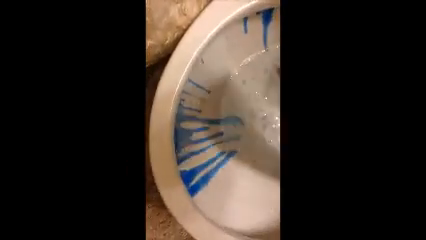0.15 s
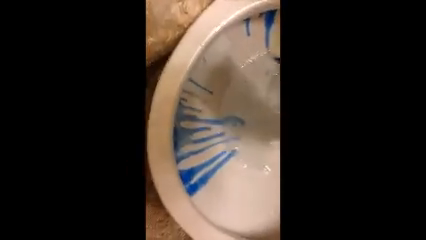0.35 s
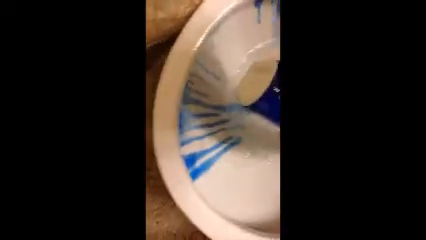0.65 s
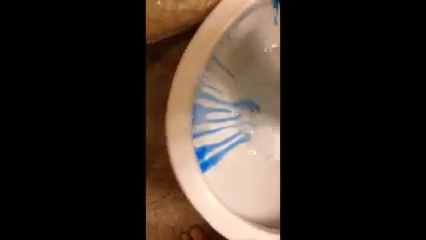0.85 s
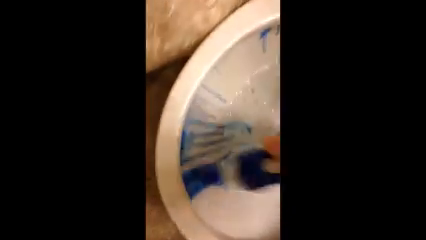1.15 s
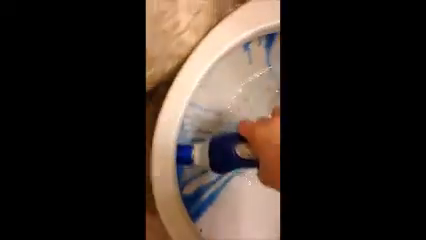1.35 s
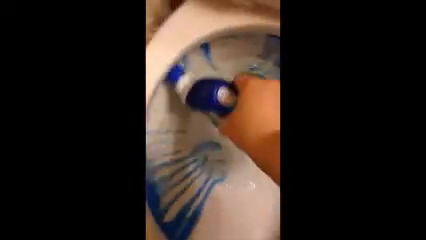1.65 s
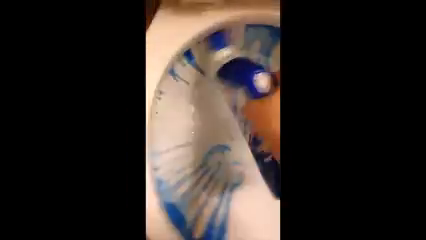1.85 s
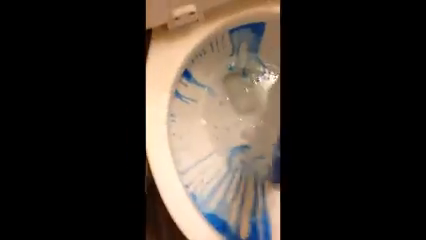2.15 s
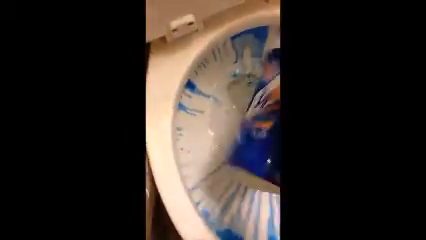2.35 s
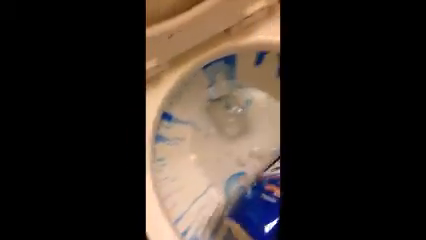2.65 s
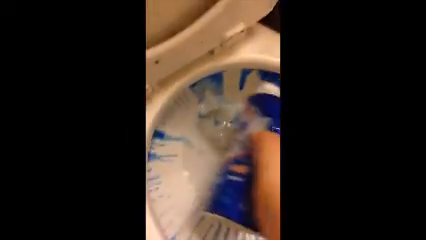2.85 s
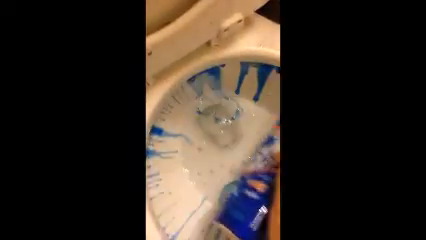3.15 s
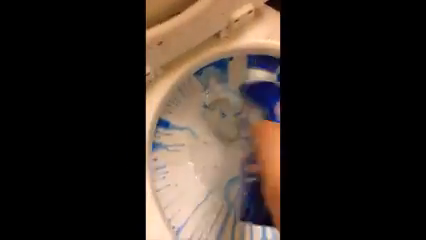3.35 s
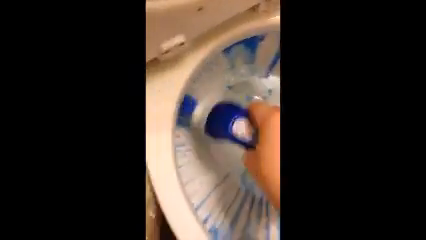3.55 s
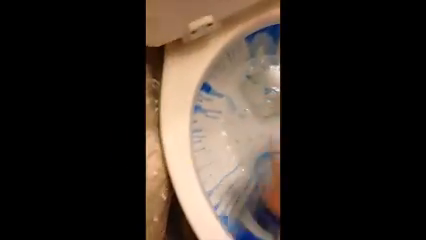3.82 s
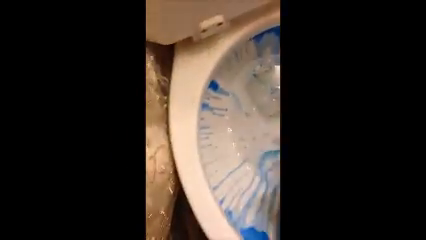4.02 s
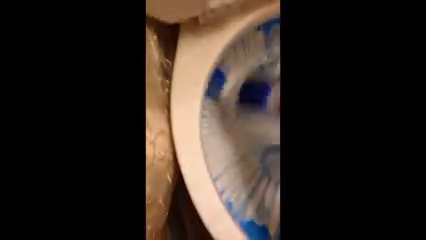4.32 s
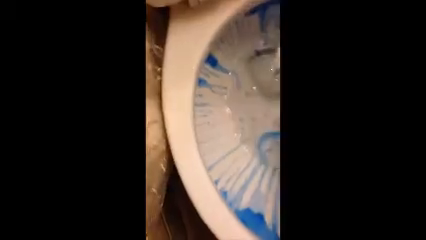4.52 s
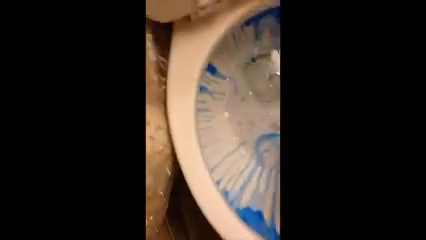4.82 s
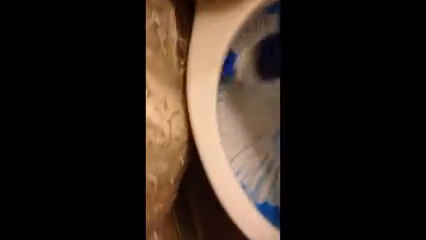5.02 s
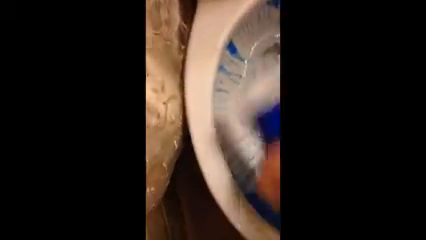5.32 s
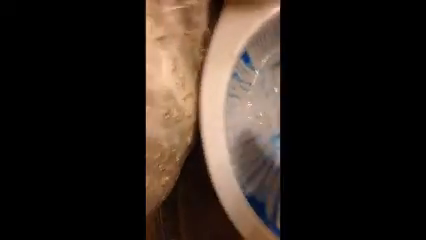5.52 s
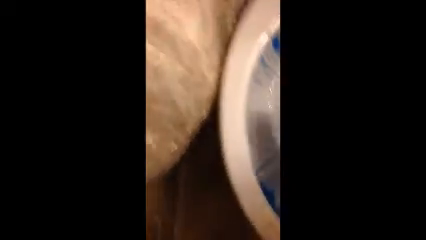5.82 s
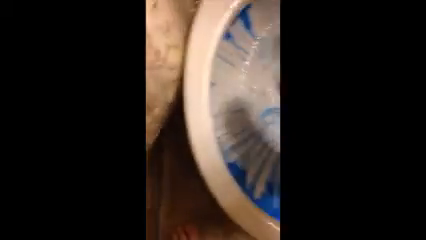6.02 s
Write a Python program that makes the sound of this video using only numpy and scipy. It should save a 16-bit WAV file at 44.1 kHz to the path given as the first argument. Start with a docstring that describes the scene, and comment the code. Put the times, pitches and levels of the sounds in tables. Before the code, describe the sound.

A plastic cleaner bottle rubs quickly under the rim of a porcelain toilet bowl, heard close through a small, bass-thin microphone. From 0 to 0.5 s, low hollow rubs and soft knocks are followed by bright ticks; lighter strokes and clicks continue to about 1.2 s. At 1.4 s a firm cluster of thuds and cracks lands, leading into stuttering scrapes through 2.5 s, with a sharp tick near 2.4. A short lull follows, then a knock at 2.9 and raspier strokes. From 3.3 to 4.5 s rubbing is nearly continuous, with hollow knocks crowded around 3.7. After a quieter gap, the strongest knock hits at 4.9 s, then harsh, fast scraping peaks around 5.3 with a ringing tick. Shorter rubs and taps run to the end at 6.1 s. Short, sparse tile echoes, faint hiss and a deep wavering drone remain throughout.

```python
"""A plastic bottle of cleaner is dragged in quick strokes under the rim of a porcelain toilet bowl.
Its nozzle stutters over the glaze: stick-slip clicks ring the hollow bottle and the stiff modes, with a hiss.
Knocks on the rim ring the same modes with a crack of noise; small bright ticks snap in between.
Sparse echoes come back from bowl and tiles, over a deep wavering drone and a faint room hiss.
A small microphone takes it all in, thin in the bass."""
import sys
import numpy as np
from scipy import signal
from scipy.fft import rfft, irfft
from scipy.io import wavfile
from scipy.ndimage import uniform_filter1d

SR = 44100
rng = np.random.default_rng(int(sys.argv[2]) if len(sys.argv) > 2 else 0)


def makeup_ratio(level_db):
    """Linear amplitude ratio for a level in decibels (20 dB per factor of ten)."""
    decades = np.asarray(level_db, float) / 20
    return 10 ** decades


def to_wav(sig):
    """Store sig (one row per channel, or 1-D mono) as 16-bit WAV at the path in sys.argv[1].

    Samples outside -1..1 are clipped; the rate is SR.
    """
    pcm = np.clip(np.atleast_2d(sig), -1, 1) * 32767
    pcm = np.round(pcm).astype(np.int16)
    wavfile.write(sys.argv[1], SR, pcm.T)  # frames by channels


N = 272538  # length of the scene in samples
CONTROL_STEP = 64  # samples between values of the slow controls

# The nozzle meets the rim. Each row: time in seconds, then relative levels in dB of the blow
# to the stiff modes, the hollow thud and the crack.
KNOCKS = [(0.092, -18, -9.5, -56), (0.306, -30, -10, -60), (0.822, -23, -13.5, -56), (1, -38, -17.5, -70),
          (1.383, -17, 3.5, -15), (1.427, -4.5, 1.5, -15.5), (1.508, -9, -4.5, -22.5),
          (1.572, -20, -6, -37.5), (1.636, -35, -7.5, -64), (1.776, -45, -4.5, -55),
          (1.998, -8.5, -19, -51), (2.12, -16.5, -14, -40), (2.14, -15, -13, -50), (2.195, -36, -6.5, -48),
          (2.353, -11, -5.5, -23), (2.489, -13, -11, -62), (2.881, -8, -4, -18.5), (3.116, -20, -47, -75),
          (3.214, -12.5, -40, -66), (3.355, -23, -16, -41), (3.41, -23, 1.5, -27),
          (3.672, -24, -1.5, -27.5), (3.71, -7, -37, -30), (3.733, -26, 1.5, -43), (3.762, -19, 0.5, -56),
          (3.805, -37, -6.5, -58), (4.195, -22, -8, -54), (4.443, -38, -2.5, -19), (4.484, -13, -2.5, -54),
          (4.551, -19, -17, -65), (4.688, -45, -21, -70), (4.902, -5, 7, -12.5), (5.094, -8, -46, -35),
          (5.182, -5, -1, -60), (5.27, -27, -7, -57), (5.328, -3, -41, -56), (5.674, -12, -7.5, -57),
          (5.701, -11, -10, -38), (5.939, -19, -10, -39), (5.955, -31, -8, -63), (6.074, -14, -13, -55)]


def evened(x):
    """Scales to rms 1."""
    return x / np.sqrt(np.mean(x ** 2) + 1e-20)


def add(mix, s, sound):
    """Mixes a sound in at time s."""
    part = mix[round(s * SR):][:len(sound)]
    part += sound[:len(part)]


def band(x, low_hz, high_hz, order):
    """Band-pass."""
    return signal.sosfilt(signal.butter(order, [low_hz, high_hz], "band", fs=SR, output="sos"), x)


def coloured(x, points):
    """Filters by a spectrum drawn on a log-frequency axis, then scales to rms 1."""
    f, db = np.transpose(points)
    hz = np.fft.rfftfreq(len(x), 1 / SR)
    gain = makeup_ratio(np.interp(np.log(hz + 1), np.log(f + 1), db))
    return evened(irfft(rfft(x) * gain, len(x)))


def ring(x, hz, width):
    """One decaying mode; steady white noise of rms 1 comes out at about rms 1."""
    r = np.exp(-np.pi * width / SR)
    turn = np.exp(2j * np.pi * hz / SR)
    return np.sqrt(2 * (1 - r ** 2)) * signal.lfilter([1], [1, -r * turn], x).imag


def smooth(v):
    """From control steps to every sample."""
    return np.interp(np.arange(N) / CONTROL_STEP, np.arange(len(v)), v)


def wander(seconds):
    """Slow chance, rms 1: noise averaged twice over the given time."""
    span = int(seconds * SR / CONTROL_STEP)
    chance = rng.standard_normal(N // CONTROL_STEP + 2)
    return smooth(evened(uniform_filter1d(uniform_filter1d(chance, span), span)))


def curve(table):
    """Columns of a control table at every sample."""
    s, *columns = np.transpose(table)
    return [np.interp(np.arange(N) / SR, s, c) for c in columns]


def stroke_powers(column, power, late, fade_s):
    """Power over time of each stroke in one layer: speed rises and falls in an arch, then lets go."""
    # Drags along the rim. Each row: start in seconds, length in seconds, share of the length (0-1)
    # at which the nozzle is fastest, relative rumble level in dB, relative scrape level in dB.
    strokes = [(-.06, 0.063, 0.93, -12.5, -18.5), (0.036, 0.33, 0.18, -23.5, -36),
               (0.123, 0.21, 0.82, -19.5, -33.5), (0.251, 0.28, 0.52, -24.5, -32),
               (0.572, 0.19, 0.24, -31, -42), (0.77, 0.17, 0.47, -21, -29.5),
               (0.98, 0.053, 0.48, -30.5, -36.5), (1.01, 0.1, 0, -46, -62),
               (1.393, 0.11, .15, -21.5, -31.5), (1.483, 0.2, 0, -23, -41.5),
               (1.544, 0.24, 0.63, -20.5, -26), (1.672, 0.12, 0.92, -22.5, -24),
               (1.771, 0.11, 0.52, -29, -33.5), (1.844, 0.2, 0, -32, -40.5),
               (1.982, 0.059, 0.5, -25.5, -21), (2.028, 0.13, 0.34, -23, -38.5),
               (2.103, 0.14, 0.33, -21.5, -26), (2.344, 0.075, 0.11, -18, -20),
               (2.37, 0.061, 0.58, -17.5, -17), (2.462, 0.085, 0.63, -27.5, -14.5),
               (2.575, 0.24, 0.02, -36.5, -45.5), (2.812, 0.079, 0.47, -44, -46.5),
               (2.871, 0.19, 0.14, -27, -23.5), (2.88, 0.071, 0.61, -15, -23.5),
               (3.084, 0.15, 0.4, -30.5, -24.5), (3.173, 0.14, 0.39, -25, -26.5),
               (3.322, 0.34, 0.23, -17.5, -21), (3.585, 0.23, 0.41, -19, -23),
               (3.71, 0.15, 0.78, -19, -32.5), (3.778, 0.26, 0.82, -21.5, -14),
               (3.972, 0.13, 0.67, -18.5, -29.5), (4.147, 0.25, 0.42, -19.5, -19.5),
               (4.301, 0.32, 0.11, -22.5, -21), (4.411, 0.11, 0, -14.5, -24.5),
               (4.496, 0.56, 0.1, -46.5, -48.5), (4.882, 0.1, 0.29, -18, -17),
               (4.936, 0.16, 0.31, -12.5, -17.5), (5.084, 0.25, 0.02, -12.5, -18),
               (5.121, 0.072, 0.4, -14.5, -19.5), (5.214, 0.12, 1, -20, -23), (5.296, 0.2, 0.29, -23, -6.5),
               (5.404, 0.17, 0.28, -14, -19), (5.57, 0.086, 0.74, -25, -32),
               (5.661, 0.14, 0.02, -23, -28.5), (5.801, 0.12, 0.64, -21.5, -21.5),
               (5.879, 0.098, 0.75, -17.5, -27.5), (6.016, 0.095, 0.59, -21, -29),
               (6.059, 0.086, 0.36, -23, -25)]
    t = np.arange(0, N + CONTROL_STEP, CONTROL_STEP) / SR
    start, length, fastest = (c[:, None] for c in np.transpose(strokes)[:3])
    # late delays the peak by a share of the stroke that remains
    peak = np.clip(fastest + late * (1 - fastest if late > 0 else fastest), 0.03, 0.95)
    u = np.clip((t - start) / length, 0, 1)
    speed = np.sin(np.pi / 2 * np.minimum(u / peak, (1 - u) / (1 - peak)))
    level_db = np.transpose(strokes)[column][:, None]
    p = makeup_ratio(2 * level_db) * speed ** (2 * power)
    keep = np.exp(-CONTROL_STEP / SR / fade_s)
    return signal.lfilter([1 - keep], [1, -keep], p, axis=1) + 1e-11


def layer_db(p):
    """Overlapping strokes add their powers."""
    return smooth(10 * np.log10(p.sum(axis=0)))


def rumble_level():
    """Rumble in dB: amplitude grows as the speed and peaks just after the fastest moment."""
    return layer_db(stroke_powers(column=3, power=1, late=0.016, fade_s=0.0087))


def background():
    """Slightly wavering hiss; a drone and a very low shake follow the rumble, the drone swells now and then."""
    # Spectrum of the room hiss. Each row: frequency in Hz, relative density in dB per Hz.
    room_spectrum = [(20, -17), (60, -3), (120, 4), (200, -10), (400, -4.5), (800, -14.5), (2000, -17),
                     (4000, -20.5), (8000, -22.5), (15500, -28)]
    # Swells of the drone. Each row: start in seconds, level in dB before the rise and decay.
    drone_swells = [(1.4, -32), (4.45, -32.5), (4.89, -37), (5.18, -31), (5.52, -40)]
    swell_rise_s, swell_t60_s = 0.07, 0.44
    rumble_db = rumble_level()
    t = np.arange(SR // 2) / SR
    level = makeup_ratio(-61) + makeup_ratio(rumble_db - 44.5)  # quiet floor, and the part under the rumble
    for s, db in drone_swells:
        add(level, s, np.minimum(t / swell_rise_s, 1) * makeup_ratio(db - 60 * t / swell_t60_s))
    drone = level * ring(rng.standard_normal(N), hz=119, width=6.6)
    shake = makeup_ratio(rumble_db - 46) * evened(band(rng.standard_normal(N), 24, 140, order=2))
    hiss = makeup_ratio(-57 + 0.53 * wander(0.055)) * coloured(rng.standard_normal(N), room_spectrum)
    return hiss + shake + drone


def bathroom(x, t60=0.11, first_s=0.0024):
    """Sparse decaying echoes from bowl and tiles; little comes back below 620 Hz."""
    t = np.arange(SR // 2) / SR
    signs = rng.choice([-1., 1.], len(t))
    present = (rng.random(len(t)) < 0.08) * (t > first_s)
    taps = signs * present * makeup_ratio(-60 * t / t60)
    return signal.oaconvolve(band(x, 620, 17000, order=2), taps / np.linalg.norm(taps))[:N]


def burst(hz, width, rise_s, decay_s):
    """A snap of noise around one band, peak 1."""
    t = np.arange(1500) / SR
    envelope = np.exp(-t / decay_s) * (1 - np.exp(-t / rise_s)) ** 2
    snap = ring(rng.standard_normal(1500) * envelope, hz, width)
    return snap / abs(snap).max()


def cracks():
    """Noise bursts: each knock's treble with a narrower after-ring, and bright ticks; low ticks last longer."""
    # Bright ticks. Each row: time in seconds, level in dB, centre in Hz, level in dB of the high snap
    # (both levels are burst peaks ahead of the band-passes).
    ticks = [(0.198, -43, 5330, -43), (0.298, -49, 5530, -42), (0.395, -24.5, 5860, -27),
             (0.42, -41, 6200, -40), (0.4854, -45, 3260, -46), (0.4992, -29.5, 5540, -25.5),
             (0.5428, -30, 5350, -30), (0.5556, -30.5, 10100, -44), (0.821, -33, 5570, -36),
             (0.996, -34.5, 7700, -39), (1.0633, -28.5, 6240, -35), (1.072, -40, 3540, -38),
             (1.185, -41, 2330, -29.5), (1.591, -30.5, 3300, -36), (1.8004, -35, 3580, -41),
             (1.817, -27, 2230, -41), (2.192, -27.5, 4800, -57), (2.314, -36, 7600, -44),
             (2.325, -42, 7500, -39), (2.389, -15.5, 9940, -19.5), (2.6634, -25.5, 6660, -17.5),
             (3.03, -43.5, 3800, -38), (3.399, -39, 8000, -36), (3.421, -28, 8700, -19.5),
             (3.437, -36, 5900, -24), (3.616, -20, 2280, -47), (4.7566, -44, 4440, -40),
             (4.877, -22.5, 6640, -27), (5.3639, -13.5, 3360, -34), (5.516, -46, 4670, -38),
             (5.6476, -21.5, 7500, -34)]
    out, snaps = np.zeros(N), np.zeros(N)
    for s, _, _, crack_db in KNOCKS:
        crack = makeup_ratio(crack_db + 5.5) * burst(1100, 3200, rise_s=0.001, decay_s=0.0029)
        after_ring = makeup_ratio(crack_db - 7.0) * burst(1600, 1300, rise_s=0.0012, decay_s=0.0097)
        add(out, s, crack + after_ring)
    for s, db, hz, snap_db in ticks:
        add(out, s, makeup_ratio(db) * burst(hz, 0.16 * hz, rise_s=0.00086, decay_s=11.0 / hz))
        add(snaps, s, makeup_ratio(snap_db) * burst(7700, 5500, rise_s=0.00082, decay_s=0.0017))
    return band(out, 1000, 12600, order=2) + band(snaps, 4400, 17000, order=2)


def slips(per_s, spread_db, judder_db, judder_s):
    """Stick-slip clicks of uneven size, clumped as the grip judders."""
    size = makeup_ratio(spread_db * np.minimum(rng.exponential(1, N), 4)) * rng.choice([-1., 1.], N)
    span = int(judder_s * SR)
    judder = evened(uniform_filter1d(uniform_filter1d(rng.standard_normal(N), span), span))
    happens = rng.random(N) < per_s / SR
    return evened(size * happens * makeup_ratio(judder_db * judder))


def blows(column, contact_s):
    """Each knock is a short rough contact force."""
    force, t = np.zeros(N), np.arange(600) / SR
    for row in KNOCKS:
        rough = 1 + 0.042 * rng.standard_normal(600)
        add(force, row[0], makeup_ratio(row[column]) * np.exp(-t / contact_s) * rough / (contact_s * SR))
    return force


def modes(table, level_db, rub, hit, favoured_hz, boost_db, octaves, hit_boost_db, hit_octaves, shared,
          wander_db, tilt_db=lambda hz: 0):
    """Rubbing and knocks ring the same modes; the grip favours those near one pitch, a knock in its own width."""
    def shares(width, boost_db, chance_db):
        """Gain of each mode over time, their powers adding up to 1."""
        gains = []
        for hz, _, db in table:
            favour_db = boost_db * np.exp(-(np.log2(hz / favoured_hz) / width) ** 2)
            gains.append(makeup_ratio(db + favour_db + tilt_db(hz) + chance_db(hz)))
        return gains / np.sqrt(sum(g ** 2 for g in gains))
    # the wet contact patch pushes each mode partly on its own, more or less as it moves along the rim
    rubbed = shares(octaves, boost_db, lambda hz: wander_db * wander(0.054))
    struck = shares(hit_octaves, hit_boost_db, lambda hz: 0)
    out = np.zeros(N)
    for k, (hz, width, _) in enumerate(table):
        push = shared * rub + (1 - shared) * rng.standard_normal(N)
        drag = (-1) ** k * makeup_ratio(level_db) * push
        out += ring(rubbed[k] * drag + struck[k] * hit, hz, width)
    return out


def bottle():
    """One stroke drives a low hollow rumble, a scrape in the stiff modes and a hiss; knocks ring the modes."""
    # Hollow air and wall modes. Each row: frequency in Hz, width in Hz, relative level in dB.
    hollow_modes = [(200, 18, -2), (222, 17, -3), (241, 15, -3), (272, 18, -2), (311, 19, 0), (345, 20, -3),
                    (372, 18, -1), (395, 22, -5), (430, 26, -12), (490, 22, -11), (545, 28, -17)]
    # Stiff modes of nozzle and porcelain. Each row: frequency in Hz, width in Hz, relative level in dB.
    stiff_modes = [(596, 46, -1.5), (656, 83, 2), (727.4, 53, -0.5), (798, 30, -1.5), (871, 75, -3.5),
                   (870, 40, 1.5), (982, 75, -0.5), (993, 76, 2), (1069, 51, -2), (1130, 130, -5),
                   (1314, 68, -1), (1390, 73, -5.5), (1440, 174, 0), (1586, 51, -3), (1712, 81, -3.5),
                   (1826, 86, -3.5), (1990, 300, -6), (2196, 110, -11.5), (2367, 61, -11), (2438, 62, -6),
                   (2145, 16, -9), (2755, 58, -13.5), (2614, 93, -8), (3040, 53, -33.5), (3800, 220, -12),
                   (4300, 190, -10), (4320, 130, -29)]
    # Narrow low mode of the bottle under the rumble: frequency in Hz, width in Hz, level in dB to the rumble.
    low_mode = (217, 19.5, -14)
    # Spectrum of the rubbing hiss. Each row: frequency in Hz, relative density in dB per Hz.
    hiss_spectrum = [(1800, -6.5), (3000, -4.5), (4200, -8), (6500, -14.5), (9800, -21), (11000, -26.5),
                     (13000, -27), (15500, -39)]
    # Modes favoured as the grip shifts. Each row: time in seconds, hollow mode in Hz, stiff mode in Hz.
    grip = [(0, 304, 850), (.24, 231, 840), (.46, 255, 930), (.64, 367, 813), (.7, 247, 890),
            (.86, 306, 627), (1.1, 370, 800), (1.39, 370, 890), (1.43, 286, 1000), (1.46, 261.5, 736),
            (1.58, 248, 780), (1.76, 345.3, 960), (1.93, 255, 815), (2.01, 296, 1030), (2.25, 263, 850),
            (2.36, 326, 790), (2.44, 394, 780), (2.62, 277.5, 690), (2.89, 307, 880), (3.0, 380, 675),
            (3.13, 375, 990), (3.27, 274, 790), (3.51, 378.4, 870), (3.75, 281.4, 840), (4.06, 276.6, 740),
            (4.23, 375, 750), (4.35, 252, 870), (4.5, 293.4, 670), (4.9, 300.3, 780), (4.96, 346, 790),
            (5.02, 384, 770), (5.16, 372, 616), (5.5, 363, 880), (5.7, 288.6, 770), (5.87, 373, 650),
            (6.08, 271, 760)]
    # Colour of the rub. Each row: time in seconds, offset of the hiss in dB,
    # base tilt of the scrape in dB per octave.
    colour = [(0, -18.5, -7), (.5, -22.5, -2.5), (1, -22, -1.5), (1.45, -17.5, 1), (1.75, -23.5, -3),
              (2, -18.5, -1), (2.2, -20.5, -2), (2.55, -29, -5), (2.92, -22.5, -1), (3.15, -29, -8.5),
              (3.45, -24.5, 0), (3.7, -18.5, 0), (4, -22, -3), (4.4, -19, 3.5), (4.55, -10.5, -6),
              (4.85, -19, -3), (5, -21.5, 3.5), (5.1, -17.5, 5), (5.2, -21.5, -2.5), (5.4, -21.5, -1),
              (5.62, -24, -10), (5.7, -14.5, -5), (5.87, -23, 0.5), (5.97, -34, -5), (6.12, -22, -4.5)]
    # Upper stiff modes favoured as the nozzle turns. Each row: time in seconds, frequency in Hz, boost in dB.
    rasp = [(0, 1710, 15), (.2, 1690, 12), (.34, 1620, -15), (.46, 1280, 3), (.65, 1420, 16.5),
            (1.05, 1360, 2), (1.5, 1460, 0), (1.68, 1800, 1), (1.79, 1390, 7.5), (2.25, 1590, 9),
            (2.55, 1260, 5.5), (2.92, 1650, 4), (3.29, 1570, 11.5), (3.56, 1680, 1), (3.7, 1500, 7.5),
            (3.99, 1440, 3.5), (4.2, 1850, -1), (4.5, 1440, 3), (4.92, 2190, 6), (5.01, 1370, 9.5),
            (5.11, 1760, 5), (5.17, 1250, 17.5), (5.38, 1710, 0.5), (5.7, 1390, 2), (5.85, 1750, -3),
            (5.9, 2460, 5), (5.96, 1820, 0), (6.07, 1500, 8), (6.13, 1880, 12)]

    rumble_db = rumble_level()
    # amplitude grows as speed to the given power
    scrape_db = layer_db(stroke_powers(column=4, power=2.5, late=0, fade_s=0.007))
    hiss_db = layer_db(stroke_powers(column=4, power=2.71, late=0.0042, fade_s=0.007))
    hollow_hz, stiff_hz = curve(grip)
    over_db, tilt_db = curve(colour)
    rasp_hz, rasp_db = curve(rasp)
    # the scrape tilts up by at most 12 dB per octave where the hiss stands above it, down where below
    bright_db = tilt_db + 12 * np.tanh((hiss_db - scrape_db) / 10)

    def scrape_tilt(hz):
        """Tilt about 1 kHz, with a narrow lift or dip at the rasp, in dB."""
        return bright_db * np.log2(hz / 1000) + rasp_db * np.exp(-(np.log2(hz / rasp_hz) / 0.11) ** 2)

    bumps = slips(per_s=600, spread_db=1.58, judder_db=3.75, judder_s=0.0092)
    grit = slips(per_s=3500, spread_db=2.3, judder_db=2.9, judder_s=0.006)
    thuds = makeup_ratio(23) * blows(column=2, contact_s=0.0019)
    raps = makeup_ratio(3) * blows(column=1, contact_s=0.0001)
    hollow = modes(hollow_modes, rumble_db, bumps, thuds, hollow_hz, boost_db=17.5, octaves=0.14,
                   hit_boost_db=32.5, hit_octaves=0.11, shared=0.56, wander_db=4.5)
    stiff = modes(stiff_modes, scrape_db, grit, raps, stiff_hz, boost_db=9.5, octaves=0.25,
                  hit_boost_db=11.5, hit_octaves=0.22, shared=0.65, wander_db=4.5, tilt_db=scrape_tilt)
    low_hz, low_width_hz, low_db = low_mode
    low = ring(makeup_ratio(rumble_db + low_db) * bumps, low_hz, low_width_hz)
    fine_grit = slips(per_s=9000, spread_db=4.6, judder_db=5.1, judder_s=0.017)
    hiss = makeup_ratio(hiss_db + over_db) * coloured(0.53 * grit + fine_grit, hiss_spectrum)
    rumble = band(hollow, 212.7, 475, order=3) + band(low, 139, 237, order=2)
    return rumble + band(stiff, 354, 4000, order=3) + hiss


def scene():
    """Bottle, cracks and ticks, their echoes, and the room."""
    rubbed, snapped = bottle(), cracks()
    echoes = bathroom(makeup_ratio(-8.0) * rubbed + makeup_ratio(-10.0) * snapped)
    return (rubbed + snapped + echoes + background())[None]


def top_cut(x):
    """Nothing passes above the cut-off."""
    return signal.sosfilt(signal.butter(12, 15910, fs=SR, output="sos"), x)


def record(dry):
    """A small microphone: bass thinned below 40 Hz, treble cut at 15350 Hz."""
    thin = signal.sosfilt(signal.butter(2, 40, "high", fs=SR, output="sos"), dry)
    narrow = signal.oaconvolve(thin, signal.firwin(255, 15350, fs=SR)[None], "same")
    return top_cut(narrow)


dry = scene()
out = record(dry)
to_wav(out)
```